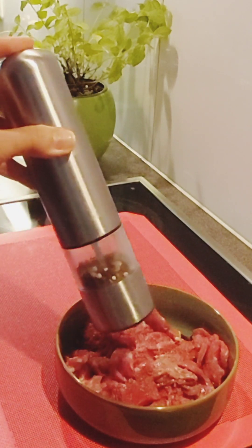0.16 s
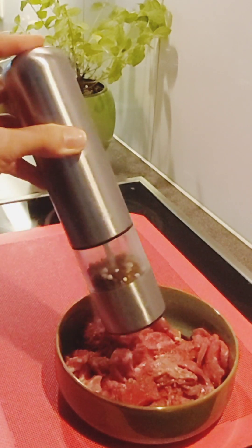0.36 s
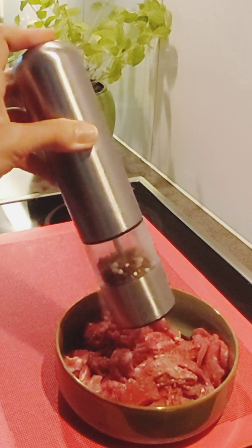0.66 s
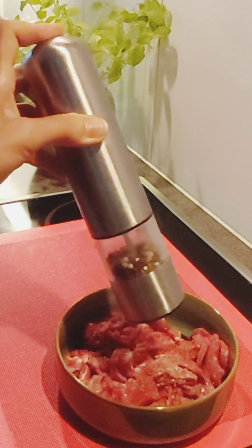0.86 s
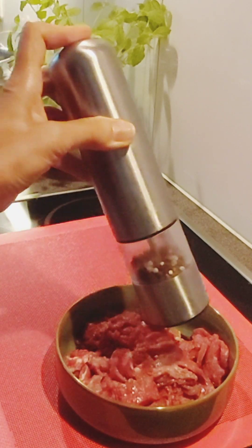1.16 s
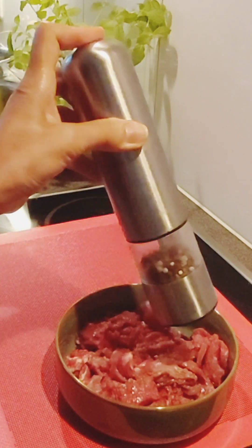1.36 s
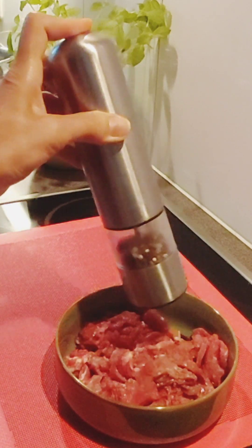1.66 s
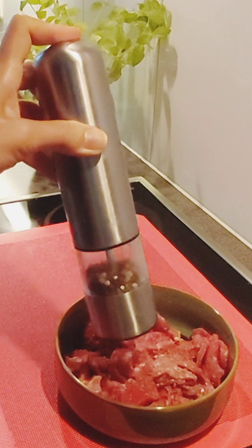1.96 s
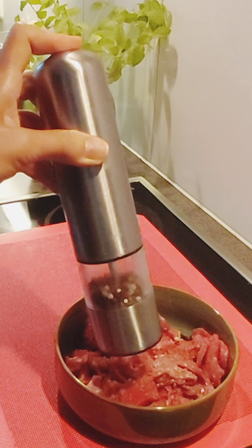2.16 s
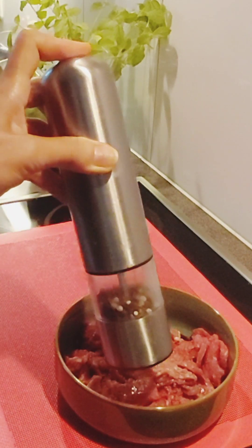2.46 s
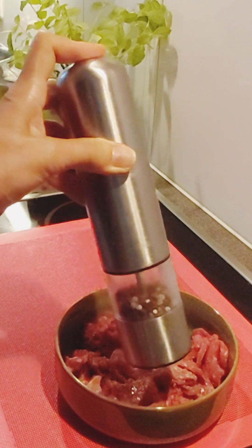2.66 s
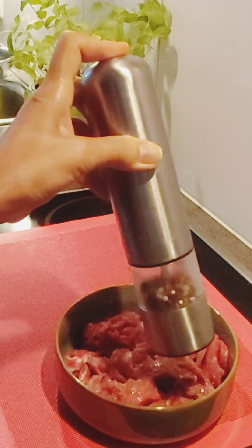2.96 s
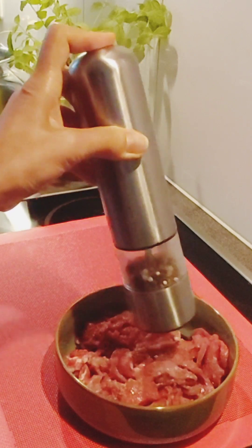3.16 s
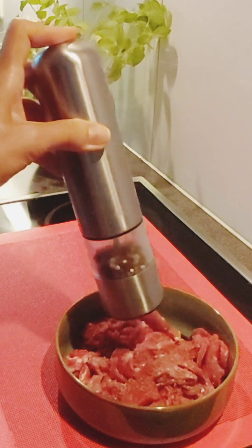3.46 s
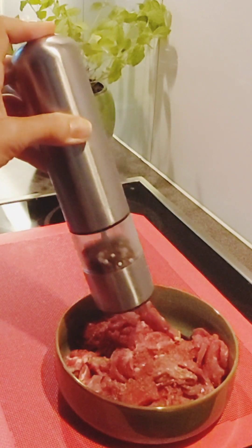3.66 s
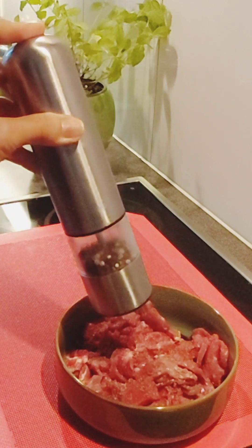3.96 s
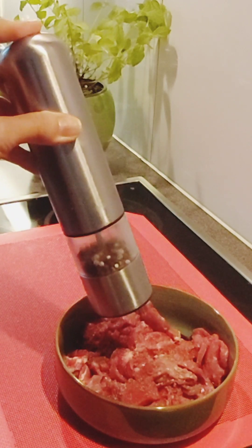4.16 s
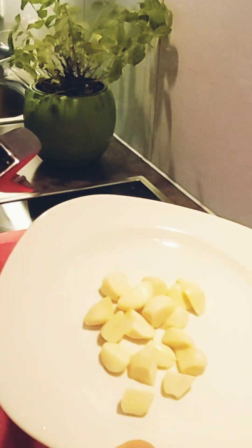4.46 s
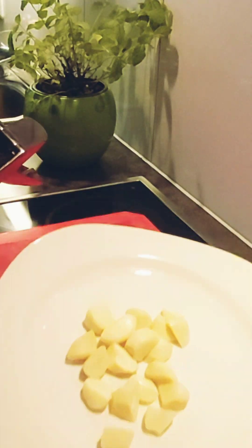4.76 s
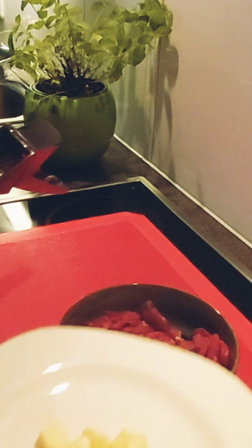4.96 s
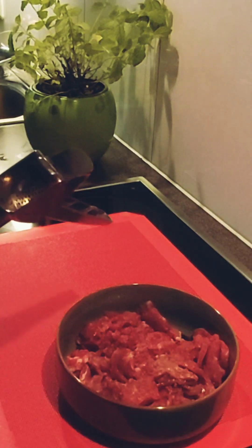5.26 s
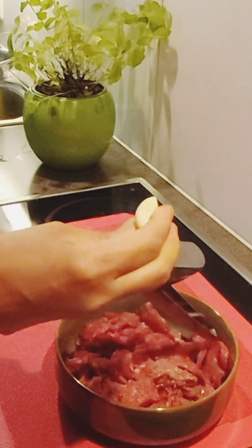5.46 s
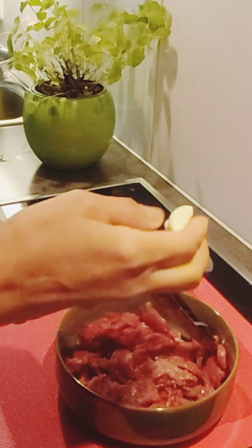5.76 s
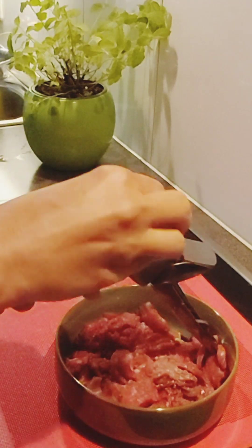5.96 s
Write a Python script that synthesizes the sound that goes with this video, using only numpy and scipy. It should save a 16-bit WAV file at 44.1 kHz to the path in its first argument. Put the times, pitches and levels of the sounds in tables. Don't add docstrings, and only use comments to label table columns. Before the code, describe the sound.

From 0 s an electric pepper mill is already grinding close to the microphone in a small kitchen. Its motor whine climbs during the first half second, then wavers, sagging as hard corns bite and recovering afterwards. Metallic gear rattle rings in the steel tube, and a bright sandy hiss comes from the grinding cones. Irregular hollow pops mark cracking peppercorns, notably around 0.2, 0.5, 1.7 and 2.5 s, with a thin sharp snap near 1.5 s. The whine is higher around 3 s and sags briefly near 3.85 s. At about 4.3 s the grinding vanishes abruptly, without winding down. Only soft hiss and distant low rumble remain, with sparse faint finger ticks from 4.6 s and small tool scuffs, clustered near 5.3 s. At 5.9 s a dull, low knock sounds as a tool is set down, followed by tiny bright ticks around 6 s.

```python
import sys
import numpy as np
from scipy import signal
from scipy.fft import rfft, irfft, next_fast_len
from scipy.io import wavfile
from scipy.ndimage import uniform_filter1d

SR = 44100
rng = np.random.default_rng(int(sys.argv[2]) if len(sys.argv) > 2 else 0)


def rack_gain(trim_db):
    fader = np.asarray(trim_db, float)
    return 10 ** (fader / 20)


def to_wav(s):
    ch = np.atleast_2d(s).T
    pcm = np.round(np.clip(ch, -1, 1) * 32767)
    wavfile.write(sys.argv[1], SR, pcm.astype(np.int16))


N = 269041
GRID = next_fast_len(N)
CUT_S = 4.3215

# (time [s], nearness [dB], grip looseness [0-1], thumb on the upper tube [0-1])
HAND = [(0.0, 2.5, 0.94, 0), (0.2, 0.5, 0.5, 0.65), (0.4, 0, 0.7, 0.3), (0.55, -0.5, 0.87, 0),
        (0.7, 1.5, 0.27, 0.13), (0.95, -1, 0.3, .1), (1.2, 0.5, 0.26, 0.37), (1.6, 2.5, 0.02, 1),
        (2.0, 1.5, 0.76, 0.25), (2.2, 2, 0, 0.5), (2.4, 2.5, 0.8, 0.8), (2.6, -0.5, 0.58, 1),
        (2.8, 0, .9, 0.3), (3.05, -1, 0.88, 0.56), (3.3, -0.5, 0.82, 0.76), (3.7, 0, 0.7, 0.3),
        (4.05, -1, 0.7, .5), (4.33, -1, 1, 0.34)]


def rms_one(x):
    return x / np.sqrt(np.mean(x ** 2) + 1e-20)


def in_time(rows):
    time_s, *columns = np.transpose(rows)
    return [np.interp(np.arange(N) / SR, time_s, column) for column in columns]


def bumps(rows):
    t = np.arange(0, N + 32, 32) / SR
    swells = sum(height * np.exp(-((t - s) / half_s) ** 2) for s, height, half_s in rows)
    return np.interp(np.arange(N) / SR, t, swells)


def at_hz(points):
    grid_hz = np.arange(GRID // 2 + 1) * SR / GRID + 1
    hz, values = np.array(points)[:, 0], np.array(points)[:, 1]
    return np.interp(np.log(grid_hz), np.log(hz), values)


def colour(x, spectrum):
    return rms_one(irfft(rfft(x, GRID) * rack_gain(at_hz(spectrum)), GRID)[..., :N])


def drift(rate_hz):
    r = np.exp(-80 * np.pi * rate_hz / SR)
    slow = signal.lfilter([1], [1, -2 * r, r * r], rng.standard_normal(N // 40 + 2002))[2000:]
    return np.interp(np.arange(N) / 40, np.arange(len(slow)), rms_one(slow))


def resonance(x, hz, width_hz):
    r = np.exp(-np.pi * width_hz / SR)
    zeros = np.array([1, 0, -1]) * (1 - r * r) / 2
    return signal.lfilter(zeros, [1, -2 * r * np.cos(2 * np.pi * hz / SR), r * r], x)


def twice_resonant(x, hz, width_hz):
    return resonance(resonance(x, hz, width_hz), hz, width_hz)


def add(out, s, sound):
    i = round(s * SR)
    out[..., i:i + sound.shape[-1]] += sound[..., :N - i]


def burst(hz, width_hz, t60_s):
    t = np.arange(round(.3 * SR)) / SR
    puff = rng.standard_normal(len(t)) * rack_gain(-60 * t / t60_s)
    puff[0] = 4.3
    puff = twice_resonant(puff, hz, width_hz)
    return puff / np.max(np.abs(puff))


def left_right(db):
    return rack_gain([[db / 2], [-db / 2]])


def shaft():
    # (time [s], speed [turns/s])
    speed = [(0.0, 173), (0.227, 195.7), (0.476, 215.5), (0.58, 213.5), (0.69, 197.2), (0.87, 195.5),
             (1.04, 206.5), (1.16, 200.5), (1.53, 214), (1.77, 194.6), (1.87, 192), (2.16, 195),
             (2.634, 198.2), (2.83, 217.5), (3.04, 223.8), (3.2, 219.8), (4.33, 222)]
    # (time [s], lost speed [turns/s], half length [s])
    stalls = [
        (0.636, 9.9, 0.01),
        (0.86, 2.82, .015),
        (1.13, 2.94, .02),
        (1.858, 4.02, .015),
        (2.37, 8, .085),
        (3.85, 5.5, .16),
    ]
    turns_per_s = in_time(speed)[0] - bumps(stalls)
    return 2 * np.pi * np.cumsum(turns_per_s * (1 + .002 * drift(40))) / SR


def order_levels(phase, load_db):
    # (shaft order, level [dB rms], share of load followed, gain with a loose grip [dB])
    main_orders = [(1, -84.5, .1, 19), (3, -68, 0.51, 2.5), (5, -70.5, .1, 5), (11, -42.5, 2.3, -5),
                   (22, -51.5, .8, -6)]
    mesh_shares = [.1, 0.23, .2, 1.0, 0.99]
    # (time [s], level [dB])
    mesh = [(0.0, 9), (0.15, -10.5), (0.3, -3), (0.5, 2), (0.8, 1.5), (0.95, 2), (1.2, 2), (1.35, 2.5),
            (1.6, 0.5), (1.85, 2), (2.1, -3), (2.45, 0.5), (2.8, -6.5), (3.02, 1), (3.25, -5.5), (3.55, -1),
            (3.85, 3), (4.33, -8)]
    # (frequency [Hz], width [Hz], lift [dB])
    housing = [(602.3, 12, 10.5), (646, 45, 11), (1060, 50, 7), (2345, 160, 5), (2457, 80, 7.5),
               (4287, 200, 14)]
    slow = slice(0, N, 32)
    near_db, loose, mesh_db = (c[slow] for c in in_time(HAND)[:2] + in_time(mesh))
    turns_per_s = uniform_filter1d(np.gradient(phase), size=441)[slow] * SR / (2 * np.pi)
    levels = []
    for (order, db, load_share, loose_db), mesh_share in zip(main_orders, mesh_shares):
        tone_hz = round(order) * turns_per_s
        level_db = db + near_db + load_share * load_db[slow] + loose_db * loose + mesh_share * mesh_db
        for hz, width_hz, lift_db in housing:
            level_db = level_db + lift_db / (1 + (2 * (tone_hz - hz) / width_hz) ** 2)
        levels.append(np.interp(np.arange(N), np.arange(N)[slow], level_db))
    return levels


def motor(phase, load_db):
    # (shaft order, level [dB rms])
    weak_orders = [(4, -66.5), (6, -68.5), (9, -57.5), (12, -55), (15, -56), (21, -62)]
    # (frequency [Hz], width [Hz], lift [dB])
    cavities = [(1223, 64, 14.5)]
    shaft_db, hum_db, bearing_db, whine_db, overtone_db = order_levels(phase, load_db)
    weak = np.zeros(N)
    for order, level_db in weak_orders:
        weak += rack_gain(level_db + 3.8 * drift(15)) * np.sin(round(order) * (phase + 0.045 * drift(48)))
    out = weak + sum(rack_gain(lift_db) * resonance(weak, hz, width_hz) for hz, width_hz, lift_db in cavities)
    out += rack_gain(shaft_db + 1.1 * drift(20)) * np.sin(phase)
    out += rack_gain(hum_db + 1.8 * drift(30)) * np.sin(3 * phase + 0.46 * drift(30))
    out += rack_gain(bearing_db + 2.1 * drift(30)) * np.sin(5 * phase + 0.18 * drift(30))
    out += rack_gain(whine_db - 2.0 + 3.2 * drift(60)) * np.sin(11 * phase + 0.21 * drift(46))
    out += rack_gain(overtone_db - 2.0 + 4 * drift(40)) * np.sin(22 * phase + 0.53 * drift(60))
    return np.sqrt(2) * out


def contacts(angle, per_s, spread_db, beat):
    sizes = rack_gain(spread_db * np.minimum(rng.exponential(1, N), 5)) * rng.choice([-1, 1], N)
    rate_per_s = per_s * (1 + np.clip(beat, 0, 1) * np.cos(angle))
    return rms_one(sizes * (rng.random(N) < rate_per_s / SR))


def rattle(angle, load_db):
    # (frequency [Hz], width [Hz], level re their curve [dB])
    tube = [(2337, 170, -7.5), (3174, 220, -2.5), (4336, 380, -1.5), (5710, 420, 1.5)]
    tube_db = [2.5, 5, 4, 1.5]
    tube_thumb_db = [1, -3.5, 1, -12]
    # (frequency [Hz], density [dB/Hz])
    gearbox = [(210, -62.5), (350, -34), (700, -19.5), (1200, -11), (1700, -5), (2350, -4.5), (2750, -3.5),
               (3550, -2), (3900, -7), (4900, -8), (6300, -12.5), (7200, -39.5), (9000, -54)]
    near_db, _, thumb = in_time(HAND)
    rattle_db = -45 + near_db + 0.87 * load_db
    out = rack_gain(7.5) * colour(contacts(angle, per_s=5500, spread_db=2.0, beat=0.51), gearbox)
    teeth = contacts(angle, per_s=2500, spread_db=3.0, beat=.6)
    for (hz, width_hz, db), ring_db, thumb_db in zip(tube, tube_db, tube_thumb_db):
        level_db = db + ring_db + thumb_db * thumb + 2 * drift(15)
        out += rack_gain(level_db) * rms_one(twice_resonant(teeth, hz, width_hz))
    return rack_gain(rattle_db + 1.0 * drift(25)) * out


def burr(angle, load_db):
    # (frequency [Hz], density [dB/Hz])
    grit_hiss = [(3710, -31), (6300, -4), (7110, -0.5), (8000, 1), (9450, -7), (10200, -3), (11700, -4.5),
                 (13300, -12), (15000, -16), (15600, -20)]
    # (frequency [Hz], width [Hz], level re hiss [dB])
    cone_rings = [(8000, 250, -15.5), (11370, 400, -16.5)]
    near_db = in_time(HAND)[0]
    burr_db = -45.5 + .6 * near_db + load_db + 0.5 * drift(2.7)
    grit = contacts(angle, per_s=11000, spread_db=2.5, beat=0.41)
    out = colour(grit, grit_hiss)
    for hz, width_hz, db in cone_rings:
        out += rack_gain(db + 4.2 * drift(3.9)) * rms_one(twice_resonant(grit, hz, width_hz))
    return rack_gain(burr_db + 1.07 + .8 * drift(25)) * out


def cracks():
    # (time [s], peak [dB], frequency [Hz], t60 [s], thud below 500 Hz re peak [dB])
    corns = [(0.186, -24.5, 950, 0.03, -45), (0.499, -30, 950, 0.014, -45.5),
             (0.637, -31.5, 950, 0.022, -23), (0.846, -37, 950, 0.045, -17), (1.111, -37, 950, 0.03, -13),
             (1.458, -42.5, 950, 0.066, -9), (1.609, -27.5, 950, 0.042, -38.5),
             (1.687, -20.5, 950, 0.02, -45), (2.325, -28.5, 950, 0.039, -14), (2.503, -23, 950, 0.025, -38),
             (2.622, -27.5, 950, 0.04, -35)]
    out = np.zeros(N)
    for s, db, hz, t60_s, thud_db in corns:
        pop = burst(hz, 1100, 0.81 * t60_s)
        thud = rack_gain(thud_db) * burst(330, 250, 4.8 * t60_s)
        add(out, s, rack_gain(db) * (pop + thud))
    return out


def at_ports(x, tones):
    # (frequency [Hz], lead [rad])
    lead = [(0, 0), (1810, 1), (2670, 0.5), (3450, 1.38), (4220, 1.13), (5770, 1.38), (6120, 0.3),
            (7410, -1.5), (8270, -2), (9390, -1.26), (10900, 19.5), (12600, 26), (14000, 27), (16200, 26.5)]
    # (frequency [Hz], left-right level [dB])
    tilt = [(60, -2.5), (110, -3), (200, 3.5), (380, -7.5), (700, -1), (1290, 4.5), (2380, -4.5), (4400, 3),
            (8120, -5), (15000, -4)]
    pose_s, room_t60_s, room_db = 0.522, .3, -1.5
    half_tilt = rack_gain(at_hz(tilt) / 2)
    half = np.exp(.5j * at_hz(lead)) * half_tilt
    direct = irfft(rfft(x + tones, GRID) * np.array([half, 1 / half]), GRID)[:, :N]

    t, hop = np.arange(round(.3 * SR)) / SR, round(pose_s * SR)
    sent = np.pad(x + rack_gain(-5.5) * tones, (hop, hop))
    wet = np.zeros((2, N + 2 * hop))
    fade = np.sin(np.pi * np.arange(2 * hop) / (2 * hop))
    for i in range(0, round(CUT_S * SR) + hop, hop):
        echoes = rng.standard_normal((2, len(t))) * rack_gain(-60 * t / room_t60_s) * (t > .004)
        echoes /= np.sqrt(np.sum(echoes ** 2, axis=1, keepdims=True))
        place = (sent[i:i + 2 * hop] * fade)[None]
        add(wet, i / SR, signal.fftconvolve(place, echoes, axes=1))
    wet = irfft(rfft(wet[:, hop:hop + N], GRID) * half_tilt ** [[1], [-1]], GRID)[:, :N]
    return (direct + rack_gain(room_db) * wet) * rack_gain(-0.5)


def snap():
    # (time [s], peak [dB], t60 [s])
    shells = [(1.4826, -20, 0.035)]
    out = np.zeros(N)
    for s, db, t60_s in shells:
        crack = burst(13500, 7000, t60_s / 4) + rack_gain(3.5) * burst(14000, 5000, t60_s * 1.4)
        add(out, s, rack_gain(db) * crack)
    return np.array([np.roll(out, 1), out]) * left_right(-5)


def handling():
    # (time [s], peak [dB], frequency [Hz], t60 [s], left-right [dB])
    finger_ticks = [(4.5794, -56, 13000, 0.02, -12), (4.649, -59, 3620, 0.02, 7.5),
                    (4.8005, -52, 5300, 0.013, -7), (4.9462, -60, 13300, 0.02, -13),
                    (4.978, -57.5, 4830, 0.018, 14), (5.2294, -61, 7830, 0.015, -10),
                    (5.24, -57, 4660, 0.028, -1.5), (5.3604, -56.5, 4330, 0.02, -0.5),
                    (5.6072, -59, 7800, 0.022, -6), (5.6773, -60, 4080, 0.02, 7),
                    (5.778, -50.5, 7300, 0.025, -9), (5.8561, -54, 12300, 0.024, -7),
                    (5.997, -47.5, 13500, 0.0086, -18.5), (6.0194, -52.5, 12800, 0.02, -8)]
    # (time [s], peak [dB], frequency [Hz], t60 [s], left-right [dB])
    tool_scuffs = [(4.649, -65, 1700, 0.044, 7), (5.271, -63, 1690, 0.04, -8),
                   (5.296, -60, 1700, 0.026, -6.0), (5.304, -57.5, 1680, 0.016, -18),
                   (5.314, -62, 1700, 0.065, 9), (5.362, -65, 1700, 0.047, -15),
                   (5.377, -65, 1710, 0.057, 5), (5.778, -58, 880, 0.039, -4), (4.7, -67, 1400, .08, 4),
                   (5.24, -68, 1880, 0.069, -3), (5.6, -65, 900, .04, 2)]
    out = np.zeros((2, N))
    for s, db, hz, t60_s, pan_db in finger_ticks:
        add(out, s, rack_gain(db) * burst(hz, 0.72 * hz, t60_s) * left_right(pan_db))
    for s, db, hz, t60_s, pan_db in tool_scuffs:
        scuff = burst(hz, 550, 1.6 * t60_s) + rack_gain(-3.5) * burst(660, 307, 2.0 * t60_s)
        add(out, s, rack_gain(db) * scuff * left_right(pan_db))
    return out


def knock():
    # (time [s], peak [dB])
    set_down = [(5.9072, -35.5)]
    # (frequency [Hz], level [dB], t60 [s])
    counter = [(157, -19, 0.088), (296, 0.5, 0.049), (630, -0.5, 0.014), (950, -13, 0.033),
               (1870, -24, 0.053)]
    # (frequency [Hz], width [Hz], level [dB], t60 [s])
    room_tail = [(158, 190, -15, 0.68), (316, 78, -12.5, 0.46), (775, 460, -18, 0.33),
                 (1800, 460, -28, 0.32)]
    out, t = np.zeros((2, N)), np.arange(round(.3 * SR)) / SR
    radiated = signal.butter(2, [110, 2200], "band", fs=SR, output="sos")
    for s, db in set_down:
        modes = sum(rack_gain(level_db - 60 * t / t60_s) * np.sin(2 * np.pi * hz * t)
                    for hz, level_db, t60_s in counter)
        modes = signal.sosfilt(radiated, modes)
        add(out, s, -rack_gain(db) * modes * left_right(-5))
        for hz, width_hz, tail_db, t60_s in room_tail:
            tail = np.array([burst(hz, width_hz, t60_s), burst(hz, width_hz, t60_s)])
            add(out, s + 0.012, rack_gain(db + tail_db) * tail * left_right(-3))
    return out


def room_tone():
    # (frequency [Hz], density [dB/Hz])
    rumble = [(18, -43), (30, -14), (54, -7), (123, -9), (156, -4), (197, -9.5), (236, -12), (324, -9),
              (402, -18.5), (662, -19), (1250, -25.5), (1600, -26.5), (2080, -43.5), (3520, -120)]
    # (frequency [Hz], density [dB/Hz])
    hiss = [(530, -18), (900, 1.5), (1280, -8.5), (2090, -5), (3190, -10), (4310, -6.5), (7060, -18),
            (7860, -13), (10100, -16.5), (12600, -5.5), (15100, -7), (16000, -26.5)]
    # (time [s], swell [dB], half length [s])
    rumble_swells = [(5.1, 2.5, .12), (5.67, 4.5, .08)]
    # (frequency [Hz], left-right likeness)
    likeness = [(60, 0.19), (130, 0.61), (290, 0.33), (640, 0.62), (1410, 0), (3100, 0), (6820, 0),
                (15000, 0.11)]
    rumble_db = -66.5 + bumps(rumble_swells) - 0.5 + 0.9 * drift(7)
    duck_db = np.interp(np.arange(N) / SR, [CUT_S, 4.58], [-6.5, 0])
    hiss_db = -73.5 + duck_db + 5.0 + .7 * drift(5)
    alike = np.clip(at_hz(likeness), -1, 1)
    out = np.zeros((2, N))
    for spectrum, db in ((rumble, rumble_db), (hiss, hiss_db)):
        mid, side = rfft(rng.standard_normal((2, GRID)))
        pair = irfft(np.sqrt(1 + alike) * mid + np.sqrt(1 - alike) * side * [[1], [-1]], GRID)
        out += rack_gain(db) * colour(pair, spectrum) * left_right(-1.4)
    return out


def scene():
    # (time [s], load [dB], half length [s])
    bites = [(0.31, -6.5, 0.012), (0.41, -3.5, 0.043), (0.62, 4.5, 0.05), (0.67, -11, 0.011),
             (0.75, -2, 0.008), (0.82, 1, 0.059), (0.915, -11, 0.012), (1.045, -1.5, 0.014),
             (1.1, 3, 0.041), (1.255, -10.5, 0.0059), (1.35, -9.5, .015), (1.4, 1.5, 0.015),
             (1.445, -9.5, 0.013), (1.495, -4.5, 0.027), (1.61, 0, 0.037), (1.66, -1.5, 0.0075),
             (1.75, 1.5, 0.011), (2.04, -4.5, 0.0098), (2.08, 2.5, 0.015), (2.22, -3.5, 0.0084),
             (2.33, 4.5, 0.0093), (2.57, 4, 0.062), (2.81, -5.5, 0.0096), (3.1, 2.5, 0.017),
             (3.21, 1, 0.0083), (3.36, 2, 0.076), (3.42, -6, .025), (3.8, 3.5, 0.012), (3.85, 4, 0.0033),
             (4.21, -3, .015)]
    angle, load_db = shaft(), bumps(bites)
    grinding = rattle(angle, load_db) + burr(angle, load_db)
    tones = motor(angle, load_db) + cracks()
    mill = at_ports(grinding, tones) * (np.arange(N) < CUT_S * SR)
    return mill + snap() + handling() + knock() + room_tone()


def roll_off(x):
    return signal.sosfilt(signal.butter(12, 16650, fs=SR, output="sos"), x)


def record(dry):
    return roll_off(dry)


dry = scene()
out = record(dry)
to_wav(out)
```